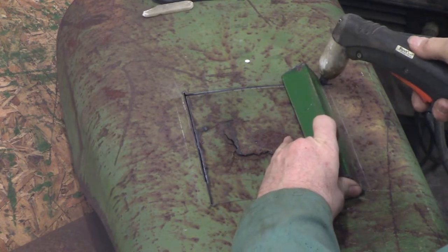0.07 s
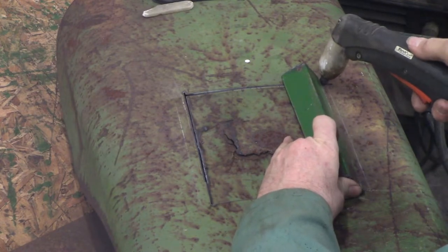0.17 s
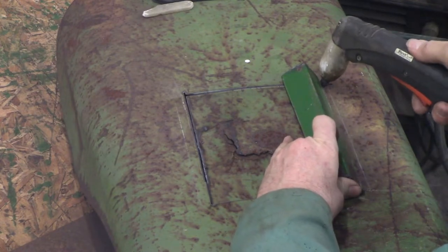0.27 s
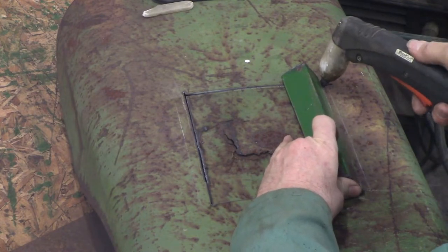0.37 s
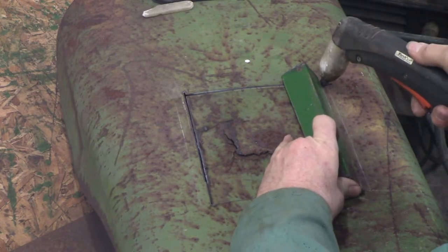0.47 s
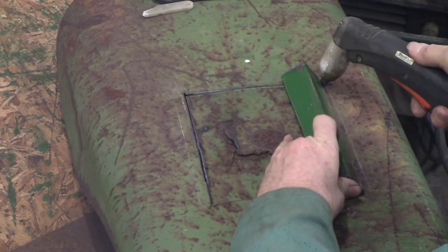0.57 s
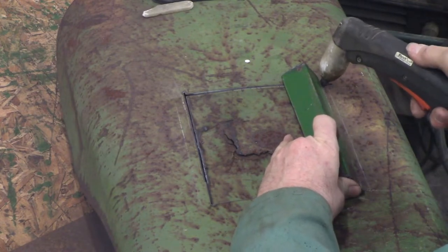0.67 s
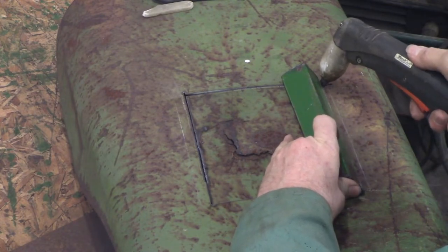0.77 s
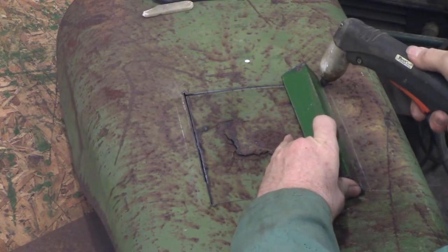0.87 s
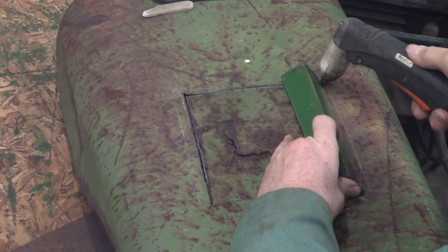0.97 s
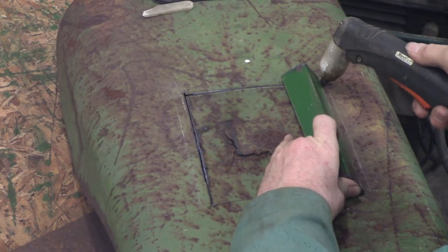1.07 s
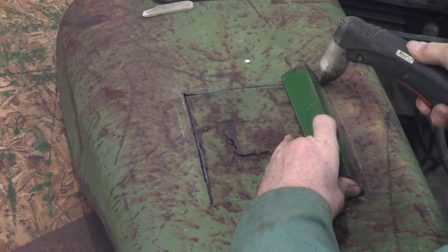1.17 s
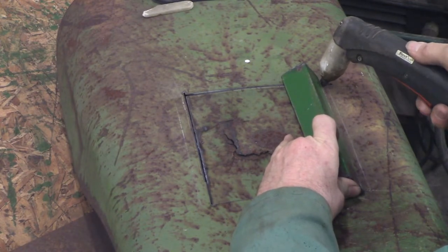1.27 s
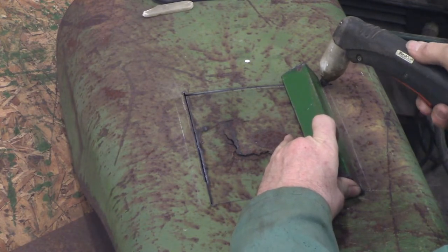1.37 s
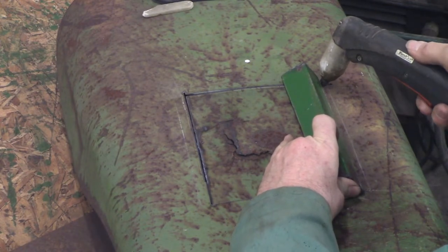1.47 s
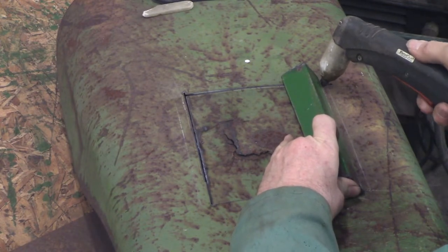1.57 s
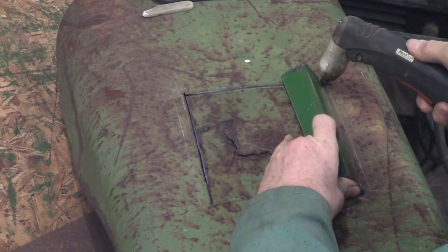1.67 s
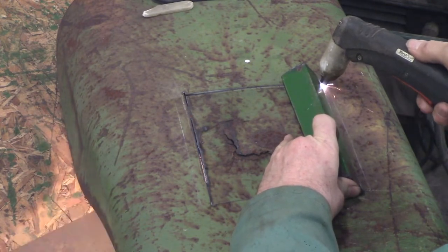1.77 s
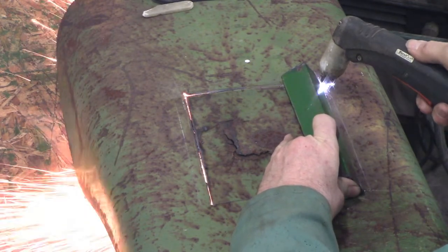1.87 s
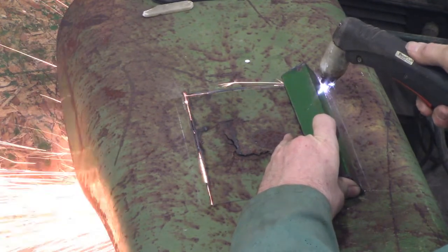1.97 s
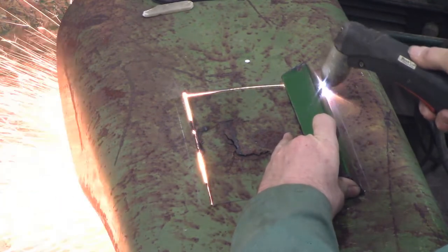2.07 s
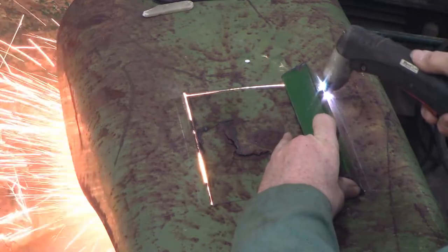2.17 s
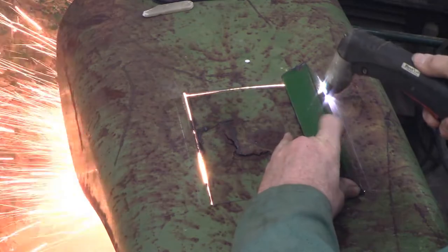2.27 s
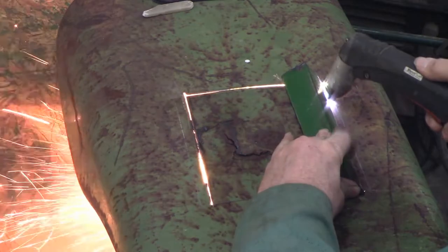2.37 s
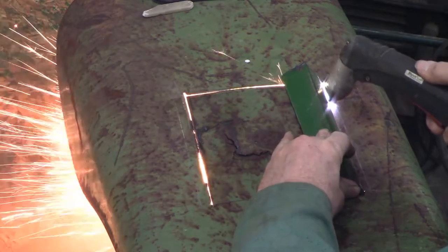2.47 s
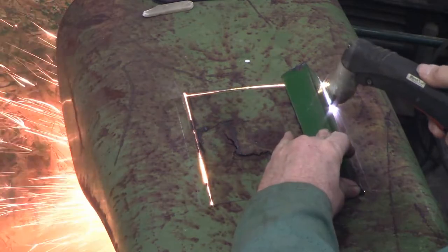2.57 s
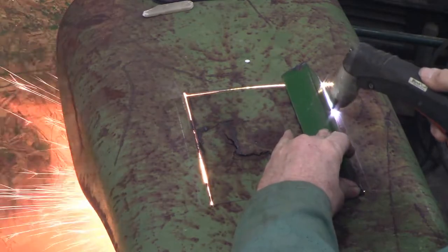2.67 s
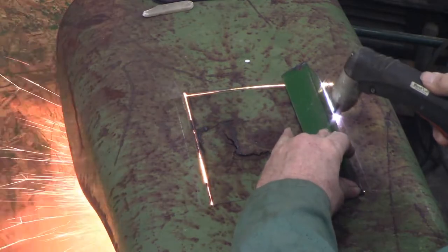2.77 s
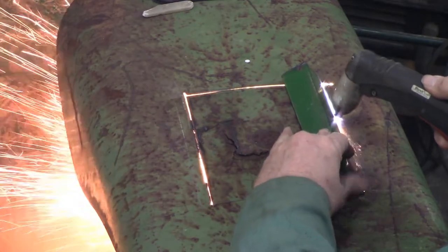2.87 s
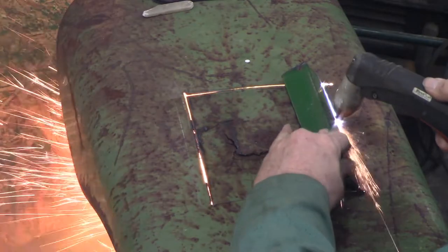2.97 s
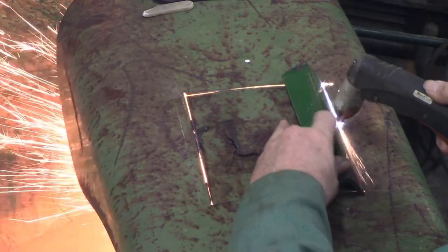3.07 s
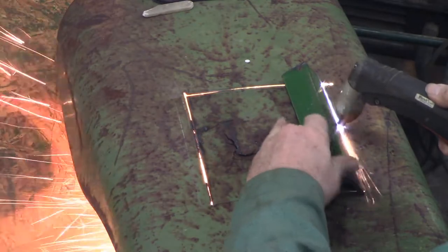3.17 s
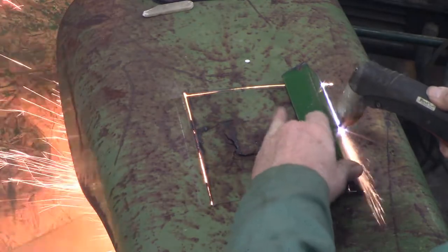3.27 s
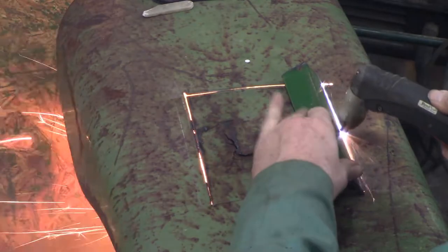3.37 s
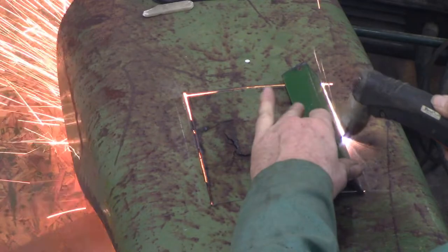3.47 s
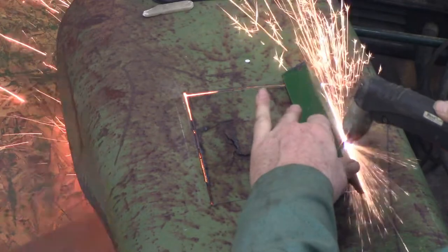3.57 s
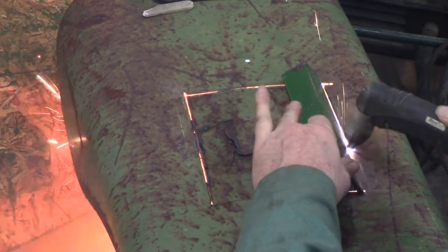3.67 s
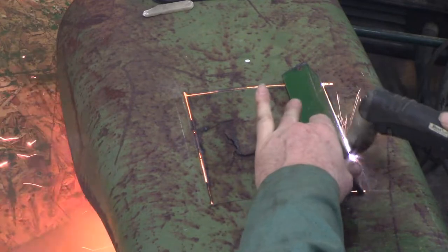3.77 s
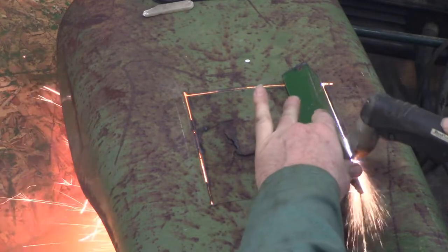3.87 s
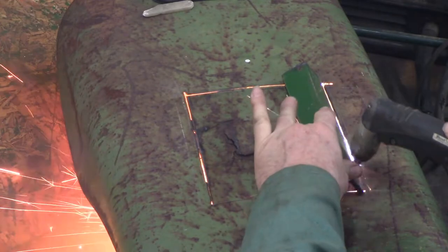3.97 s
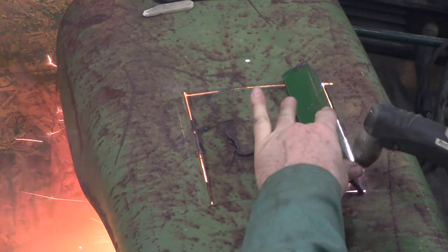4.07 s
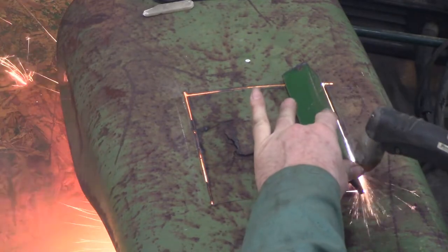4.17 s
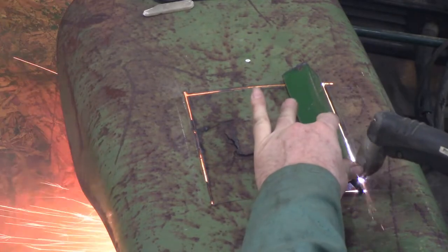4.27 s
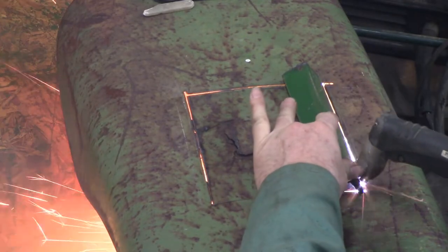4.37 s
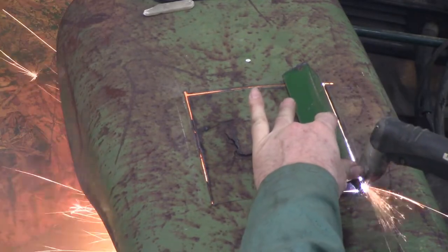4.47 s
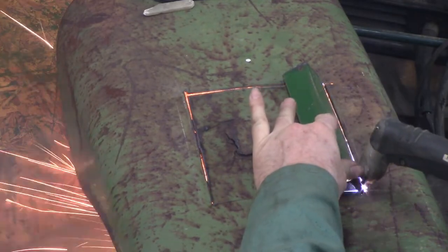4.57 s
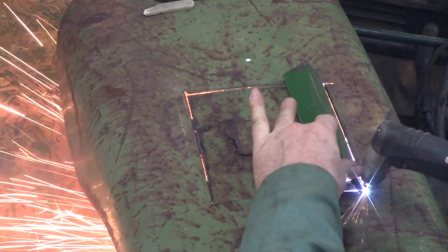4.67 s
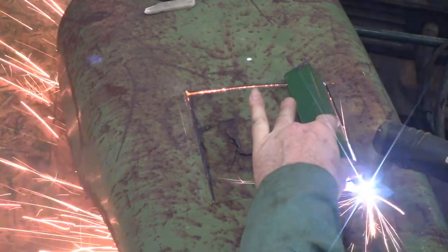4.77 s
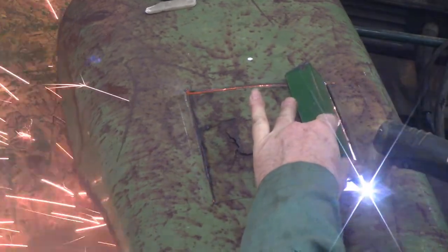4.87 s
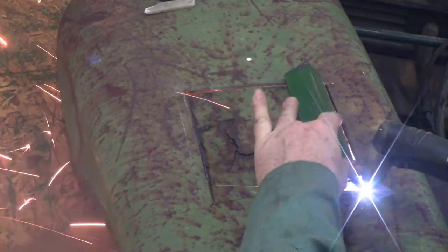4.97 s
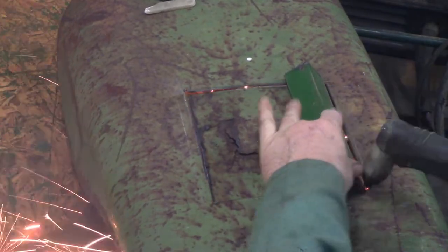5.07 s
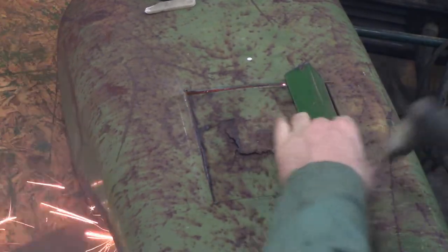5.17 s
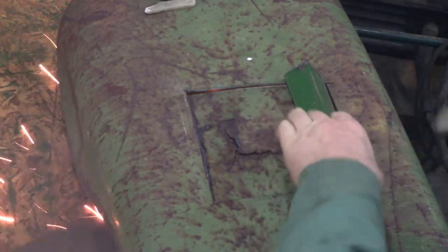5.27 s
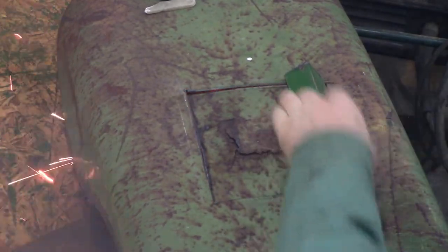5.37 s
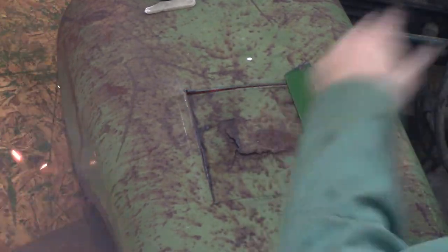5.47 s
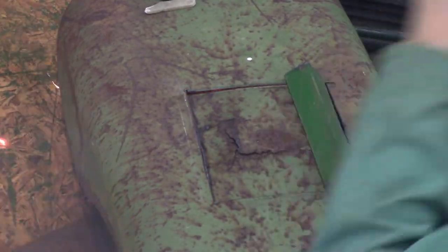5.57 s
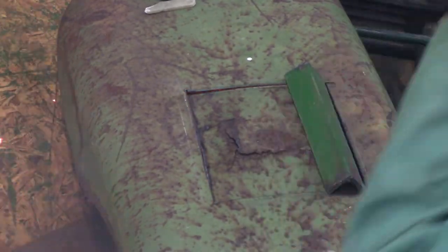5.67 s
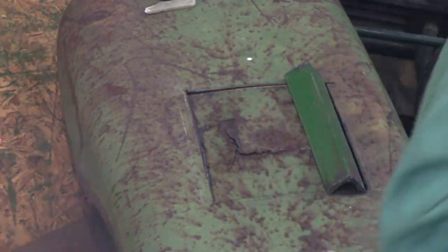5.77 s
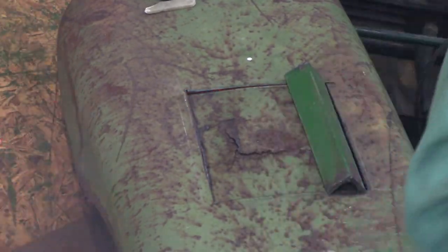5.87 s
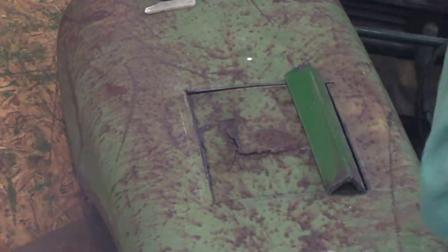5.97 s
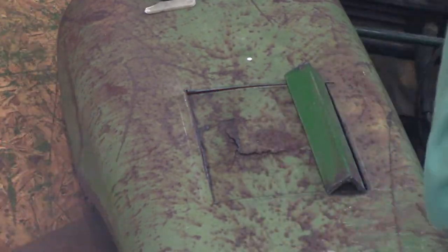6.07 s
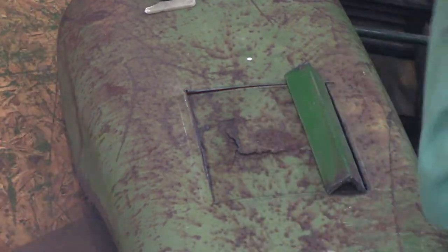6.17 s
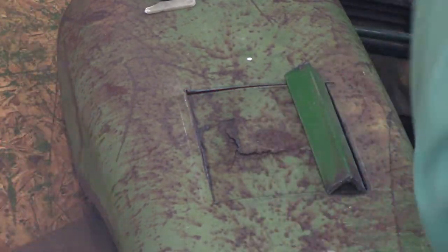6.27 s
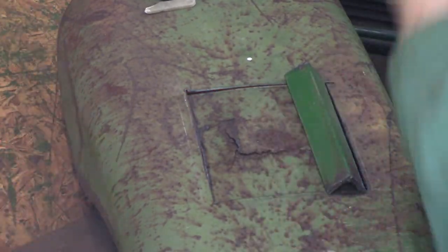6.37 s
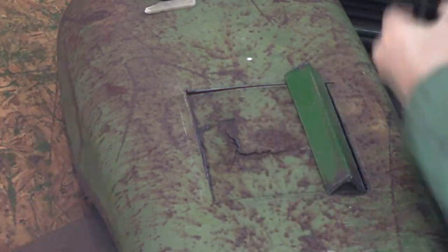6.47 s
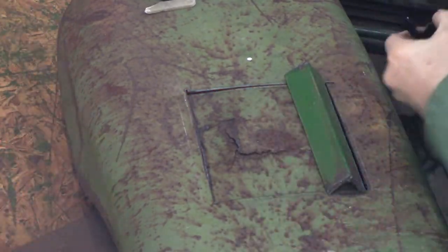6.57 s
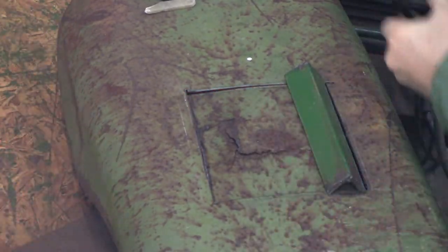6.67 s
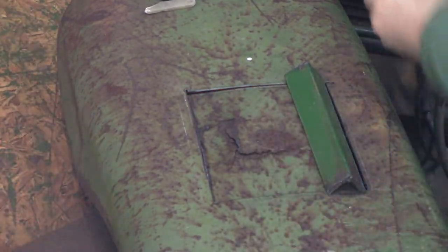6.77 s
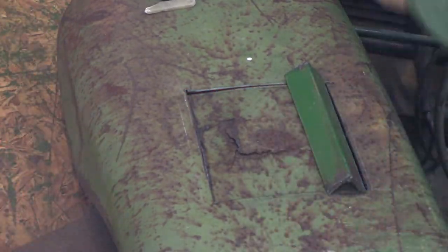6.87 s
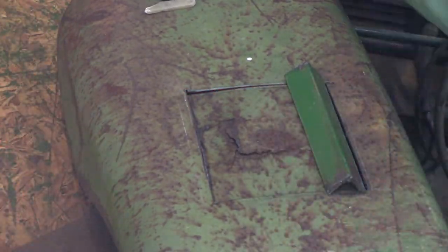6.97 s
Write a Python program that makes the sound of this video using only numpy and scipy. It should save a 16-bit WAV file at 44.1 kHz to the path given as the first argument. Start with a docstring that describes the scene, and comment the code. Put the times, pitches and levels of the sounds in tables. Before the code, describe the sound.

A hand plasma torch blows steady air onto a rusty panel, with a small scrape and a double metallic knock. The air runs out, leaving the unit's wavering fan. Then a sharp crack starts a dense, loud cutting hiss with crackle and low drumming. It weakens unevenly near the end; the loose steel pings and thuds, and only soft cooling air remains. Close, fairly dry, centred sound.

```python
"""In a workshop, a hand plasma torch cuts a rusty steel panel over the fan of its power unit.
Air (shaped noise) hisses from the nozzle, the torch knocks on the sheet (ringing modes) and the air runs down.
The arc strikes, roars through the cut and spits: fluttering noise with random pops, coloured by the slot.
The sheet pings and thumps as the cut ends, and the torch is carried away still blowing.
The fan is a set of unsteady blade tones over a soft rush of noise."""
import sys
import numpy as np
from scipy import signal
from scipy.fft import rfft, irfft, next_fast_len
from scipy.io import wavfile
from scipy.ndimage import uniform_filter1d, map_coordinates

SR = 44100
rng = np.random.default_rng(int(sys.argv[2]) if len(sys.argv) > 2 else 0)


def unload_wav(signal):
    """Save mono or channel-first audio to the path in sys.argv[1] as 16-bit WAV at rate SR, clipped to [-1, 1]."""
    wavfile.write(
        sys.argv[1],
        SR,
        np.round(np.clip(np.atleast_2d(signal).T, -1, 1) * 32767).astype(np.int16),
    )


N = 309129
T = np.arange(N) / SR   # time of every sample, in seconds

# The course of the job: trigger pulled, arc lit, sheet pierced, piece coming loose, arc out
TRIGGER_S, STRIKE_S, PIERCED_S, LOOSE_S, OUT_S = 1.714, 1.774, 1.99, 4.33, 5.245


def from_db(db):
    """Turn decibels into a gain."""
    return 10 ** (np.asarray(db) / 20)


def rms_one(x):
    """Scale a sound to unit power."""
    return x / np.sqrt(np.mean(x ** 2) + 1e-20)


def ramp(start, length):
    """Rise evenly from 0 to 1."""
    return np.clip((T - start) / length, 0, 1)


def between(start, end, fade):
    """Open a gate with soft edges, each centred on its time."""
    opening = np.clip((T - start) / fade + .5, 0, 1)
    closing = np.clip((end - T) / fade + .5, 0, 1)
    return opening * closing


def since(start):
    """Seconds passed since a moment, 0 before it."""
    return np.maximum(T - start, 0)


def drift(rate):
    """Wander at random with spread 1, mostly slower than the rate in Hz."""
    size = next_fast_len(N)
    hz = np.arange(size // 2 + 1) * SR / size
    noise = rfft(rng.standard_normal(size))
    return rms_one(irfft(noise / (1 + (hz / rate) ** 2), size)[:N])


def colour(x, spectrum):
    """Shape a sound by a spectrum that falls away beyond its first and last points; unit power."""
    size = next_fast_len(N)
    hz = np.maximum(np.arange(size // 2 + 1) * SR / size, 1)
    points, db = np.transpose(spectrum)
    gain = from_db(np.interp(np.log(hz), np.log(points), db))
    gain *= np.minimum(1, hz / points[0]) ** 3
    gain *= np.minimum(1, points[-1] / hz) ** 4
    return rms_one(irfft(rfft(x, size) * gain, size)[:N])


def steady(x, size=3000):
    """Even out the power over a window of samples, so that only the colour moves."""
    return x / np.sqrt(uniform_filter1d(x ** 2, size) + 1e-12)


def turbulence(flutter_db, flutter_rate):
    """Make noise whose strength flutters as eddies pass."""
    return rms_one(rng.standard_normal(N) * from_db(flutter_db * drift(flutter_rate)))


def spatter(per_s, spread_db):
    """Scatter random pops of molten metal, most small and a few large."""
    sizes = from_db(spread_db * np.minimum(rng.exponential(1, N), 4))
    signed = sizes * rng.choice([-1, 1], N)
    return rms_one(signed * (rng.random(N) < per_s / SR))


def ring(x, hz, t60):
    """Ring one mode: a unit click starts a dying sine of height 1 (60 dB down after t60 seconds)."""
    r = from_db(-60 / (t60 * SR))
    w = 2 * np.pi * hz / SR
    return signal.lfilter([0, np.sin(w)], [1, -2 * r * np.cos(w), r * r], x + 1e-18)


def resonance(x, hz, width_hz, gain_db):
    """Raise or cut one fixed band by a gain that may change."""
    band = signal.lfilter(*signal.iirpeak(hz, hz / width_hz, fs=SR), x)
    return x + (from_db(gain_db) - 1) * band


def moving_resonance(x, hz, width_hz, gain_db, size=256):
    """Raise or cut a band whose centre glides, stepped in blocks of samples."""
    band, state = np.zeros(N), np.zeros(2)
    k = np.tan(np.pi * width_hz / SR)
    for i in range(0, N, size):
        if gain_db[i]:
            poles = [1 + k, -2 * np.cos(2 * np.pi * hz[i] / SR), 1 - k]
            band[i:i + size], state = signal.lfilter([k, 0, -k], poles, x[i:i + size], zi=state)
    return x + (from_db(gain_db) - 1) * band


def glides(x, rows, fade, wander):
    """Pass a sound through peaks or notches that each come, slide unsteadily and go."""
    unsteady = 1 + wander * drift(6)
    for start, end, from_hz, to_hz, width_hz, gain_db in rows:
        centre_hz = np.interp(T, [start, end], [from_hz, to_hz]) * unsteady
        x = moving_resonance(x, centre_hz, width_hz, gain_db * between(start, end, fade))
    return x


def echo(x, lag_ms):
    """Repeat the sound a moment later, by a delay that may change."""
    return map_coordinates(x, [np.arange(N) - lag_ms * SR / 1000], order=3)


def workshop(x, wet_db, t60):
    """Add scattered reflections from bench and walls, dying away."""
    age = T[:SR // 2]
    echoes = rng.standard_normal(len(age)) * (rng.random(len(age)) < .02) * (age > .002)
    echoes *= from_db(-60 * age / t60)
    wet = signal.fftconvolve(x, echoes / np.linalg.norm(echoes))[:N]
    return (x + from_db(wet_db) * wet) / np.sqrt(1 + from_db(2 * wet_db))


# Tone colour of the fan's rush of air
# columns: pitch_hz [Hz], level_db [dB per Hz]
FAN_RUSH_COLOUR = [(45, -40), (100, -50), (180, -8), (410, -4), (520, 4), (640, -0.5), (780, -3.5),
                   (1250, -7.5), (1500, -12), (2200, -16)]
BLADE_HZ, SECOND_BLADE_HZ, LOAD_SAG_HZ = 614, 596, 6   # the sag is that of the first tone
BLADE_DB, RUSH_DB = -42.5, -40
WAVER_DB, JITTER = 2.0, .0035   # spread of the tones' level, and of their pitch as a share
BLADE_DB_PER_S, OCTAVE_DB_PER_S = -0.5, -0.88   # the tones slowly weaken
# Both fan sounds are weaker for a while; the tones come back first
SHADED_FROM_S, TONES_BACK_S, RUSH_BACK_S, SHADE_DB = 2.4, 5.6, 6.63, -5


def fan(octave_db, second_db):
    """The arc's load slows the fans a little: two unsteady blade tones and an octave over a soft rush."""
    speed = 1 - LOAD_SAG_HZ / BLADE_HZ * between(STRIKE_S, OUT_S, fade=0.22)

    def tone(hz, db):
        """Blur and shake one blade tone, as the eddies it meets do."""
        phase = 2 * np.pi * np.cumsum(hz * speed * (1 + JITTER * drift(25))) / SR
        return np.sin(phase) * from_db(db + WAVER_DB * drift(18))

    blade_db = BLADE_DB_PER_S * T + SHADE_DB * between(SHADED_FROM_S, TONES_BACK_S, fade=.1)
    blades = tone(BLADE_HZ, blade_db) + tone(SECOND_BLADE_HZ, blade_db + second_db)
    octave = tone(2 * BLADE_HZ, octave_db + OCTAVE_DB_PER_S * T)
    rush = colour(rng.standard_normal(N), FAN_RUSH_COLOUR) * from_db(RUSH_DB)
    shade = from_db(SHADE_DB * between(SHADED_FROM_S, RUSH_BACK_S, fade=0.87))
    return from_db(BLADE_DB) * (blades + octave) + rush * shade


# The natural tones (modes) of the steel panel
# columns: pitch_hz [Hz], level_db [dB], t60_s [s, time to die by 60 dB]
PANEL_MODES = [(206.3, -12.5, 0.47), (267.2, -1, 0.27), (309, -4.5, 0.18), (319.8, -1.5, 0.27),
               (355.5, -5.5, 0.16), (393.5, -15.5, 0.22), (435, -4.5, 0.079), (497, -17, 0.14),
               (680, -19, 0.11), (770, -4, 0.21), (805, -10, 0.14), (903, -16, 0.2), (1300, -23, 0.23),
               (2380, -21, 0.18), (2800, -30, 0.061)]


def sheet(force):
    """Any force on the panel rings all its modes, pushed in alternating directions."""
    ringing = 0
    for k, (hz, db, t60) in enumerate(PANEL_MODES):
        ringing = ringing + (-1) ** k * from_db(db) * ring(force, hz, t60)
    return ringing


DRAG_ATTACK_S, DRAG_RELEASE_S = 0.011, 0.069


def strokes(rows):
    """Gain of a series of rubs: each swells, holds and dies away."""
    gain = 0
    for s, length, db in rows:
        dying = np.exp(-since(s + length) / DRAG_RELEASE_S)
        gain = gain + from_db(db) * ramp(s, DRAG_ATTACK_S) * dying
    return gain


# Nozzle and guide bar dragging on the sheet
# columns: start_s [s], length_s [s], level_db [dB]
SHEET_DRAGS = [(.21, 0.19, -40), (1.19, 0.14, -37.5), (2.0, 0.38, -34.5), (3.38, 0.13, -32.5),
               (4.59, 0.057, -39), (4.73, 0.14, -35), (4.99, 0.097, -31.5), (5.2, 0.24, -39.5)]
# The hose rubbing as the torch is moved
# columns: start_s [s], length_s [s], level_db [dB]
RUBS_OF_HOSE = [(.21, .06, -60), (6.28, 0.28, -57.5), (6.8, .25, -54)]
# Tone colours of the scuffing sheet and of the hose
# columns: pitch_hz [Hz], level_db [dB per Hz]
SCUFF_SPECTRUM = [(140, -18), (220, -7), (320, -3), (450, -5), (650, -8.5), (1000, -16), (1600, -32)]
HOSE_SPECTRUM = [(30, -32), (90, -6), (180, -2), (300, -5)]
RESTING_DB = -51   # force of the resting hand


def handling(scuff_db):
    """The sheet stirs and scuffs under the resting hand and with each drag; the hose rubs dully."""
    force = from_db(RESTING_DB) * between(-1, 5.7, fade=0.24) + strokes(SHEET_DRAGS)
    rubbing = colour(turbulence(flutter_db=2.0, flutter_rate=33), SCUFF_SPECTRUM)
    ringing = rms_one(sheet(rubbing))
    scuff = colour(turbulence(flutter_db=-1.0, flutter_rate=98), SCUFF_SPECTRUM)
    stir = steady(ringing + from_db(scuff_db) * scuff) * force
    hose = colour(turbulence(flutter_db=-3.0, flutter_rate=15), HOSE_SPECTRUM)
    return stir + hose * strokes(RUBS_OF_HOSE)


# Knocks on the sheet and cracks of the arc
# columns: start_s [s], ring_db [dB], dull_thud_db [dB], sharp_crack_db [dB]
BLOWS = [(.242, -48, -42, -15), (1.1295, -19.5, -19, -4.5), (1.153, -26, -19, -45), (1.256, -37, -26, -45),
         (1.7741, -30, -19.5, -7), (2.203, -27.5, -38, -37), (3.448, -52, -18, -35),
         (4.984, -25.5, -7, -12), (5.034, -43, -23, -45), (5.118, -38, -27, -22), (5.375, -42, -31, -50)]
# Tone colour of the clatter, the panel's many higher modes
# columns: pitch_hz [Hz], level_db [dB per Hz]
CLATTER_SPECTRUM = [(170, -20), (280, 12.5), (450, -6), (800, 2.5), (1100, -8), (1350, -19), (2500, -31)]
CRACK_TICK_DB = 3.5   # the first contact, over the short burst that follows it


def knocks(crack_decay, clatter_decay, clatter_db):
    """Each blow is a short crack, a dull push of the panel, its low modes, and a dense higher clatter."""
    rings, thuds, cracks = np.zeros((3, N))
    for s, ring_db, thud_db, crack_db in BLOWS:
        i = round(s * SR)
        rings[i], thuds[i], cracks[i] = from_db([ring_db, thud_db, crack_db])
    age = T[:SR // 2]

    burst = rng.standard_normal(len(age)) * np.exp(-age / crack_decay)
    crack = signal.fftconvolve(cracks, burst)[:N] + from_db(CRACK_TICK_DB) * cracks
    crack = signal.sosfilt(signal.butter(2, [700, 8000], "band", fs=SR, output="sos"), crack)

    dense = colour(rng.standard_normal(N), CLATTER_SPECTRUM)[:len(age)]
    clatter = signal.fftconvolve(rings, dense * np.exp(-age / clatter_decay))[:N]

    thud = ring(thuds, hz=263, t60=0.04)
    thud = thud - 0.47 * ring(thuds, hz=680, t60=0.014) + 0.17 * ring(thuds, hz=1300, t60=0.061)
    body = sheet(rings) + thud + from_db(clatter_db) * clatter
    body = signal.sosfilt(signal.butter(3, 150, "high", fs=SR, output="sos"), body)
    return body + crack


# Moments when the loose piece sings
# columns: start_s [s], end_s [s], level_db [dB]
SINGING = [(4.74, 4.789, -19), (4.85, 4.885, -35)]
# The natural tones of the loose piece
# columns: pitch_hz [Hz], level_db [dB]
LOOSE_PIECE_MODES = [(603, -11), (829, 1), (974, -21)]


def pings(fall_s, tail_db, tail_s):
    """The nearly freed steel sings for an instant and leaves a faint tail."""
    level = 0
    for start, end, db in SINGING:
        age = since(start)
        note = between(start, end, fade=0.0082) * np.exp(-age / fall_s)
        tail = from_db(tail_db) * between(start, 8, fade=.014) * np.exp(-age / tail_s)
        level = level + from_db(db) * (note + tail)
    phase = 2 * np.pi * np.cumsum(1 + 0.0055 * drift(40)) / SR   # shared by all modes, per Hz
    return level * sum(from_db(db) * np.sin(hz * phase) for hz, db in LOOSE_PIECE_MODES)


# Soft pressure puffs as the arc lights, flares and breaks through the edge
# columns: start_s [s], level_db [dB, the kick before its low end is trimmed]
ARC_PUFFS = [(1.777, -30.5), (3.77, -30), (4.984, -38)]


def puffs(hz, t60, flare_db):
    """Pressure kicks from the arc ring one low tone: a few strong ones and many random flares."""
    kicks = from_db(flare_db) * spatter(per_s=10.8, spread_db=4.5) * between(1.9, 4.7, fade=0.1)
    for s, db in ARC_PUFFS:
        kicks[round(s * SR)] += from_db(db)
    return signal.sosfilt(signal.butter(2, 85, "high", fs=SR, output="sos"), ring(kicks, hz, t60))


# Strength of the cutting jet, given as the level of its hiss
# columns: time_s [s], level_db [dB]
JET_STRENGTH = [(1.78, -26), (2.03, -19), (3.55, -20), (3.74, -19), (3.76, -21), (4.09, -20.5),
                (4.11, -22.5), (4.56, -25.5), (4.61, -24), (4.68, -27), (4.96, -22.5), (5.0, -27.5),
                (5.06, -31.5), (5.13, -27.5), (5.27, -36)]
FULL_JET_DB = -19.5


def driven(law):
    """Gain of a sound that follows the jet and changes steadily as the torch travels."""
    level_db, share, db_per_s = law
    jet_db = np.interp(T, *np.transpose(JET_STRENGTH))
    return from_db(level_db + share * (jet_db - FULL_JET_DB) + db_per_s * since(PIERCED_S))


# How the panel's rumble follows the jet
# columns: full_jet_db [dB], share of the jet's swing [ratio], change [dB per s]
RUMBLE_DRIVE = (-29, 0.3, -1.5)
# Tone colour of the drumming
# columns: pitch_hz [Hz], level_db [dB per Hz]
DRUM_SPECTRUM = [(30, -45), (90, -36), (130, -17), (190, -4), (270, -1.5), (340, 5), (430, -3.5),
                 (700, -16), (1500, -36)]


def panel_rumble(unpierced_db, slack_db, surge_db):
    """The jet drums unevenly on the sheet, harder once it has pierced it, less as the piece goes slack."""
    ringing = rms_one(sheet(turbulence(flutter_db=0.5, flutter_rate=57)))
    drumming = colour(turbulence(flutter_db=1.5, flutter_rate=9.6), DRUM_SPECTRUM)
    drum = steady(rms_one(ringing + from_db(-0.5) * drumming), size=12000)
    level_db = unpierced_db * between(-1, PIERCED_S, fade=0.044)
    level_db = level_db + slack_db * ramp(LOOSE_S, 0.24) + surge_db * drift(0.77)
    return drum * driven(RUMBLE_DRIVE) * from_db(level_db) * between(STRIKE_S, OUT_S, fade=0.046)


# Notches (and one faint peak) that the gap under the nozzle slides through the hiss
# columns: start_s [s], end_s [s], from_hz [Hz], to_hz [Hz], width_hz [Hz], gain_db [dB]
GAP_NOTCHES = [(.3, .72, 9050, 8950, 500, -7), (.66, 1.0, 8400, 8100, 400, 1),
               (.78, 1.98, 11500, 11300, 450, -6), (2.0, 3.354, 11000, 10600, 800, -11),
               (2.75, 3.45, 10100, 9900, 300, -9), (3.0, 3.95, 6350, 6000, 400, -7),
               (3.75, 4.9, 5400, 5200, 450, -2.5), (3.1, 3.75, 7550, 7100, 350, -6),
               (3.3, 4.55, 11750, 11400, 550, -13), (3.35, 3.95, 13300, 12700, 500, -7),
               (3.45, 4.5, 10700, 10200, 500, -3), (3.897, 4.5, 2820, 2740, 350, -6),
               (3.9, 4.7, 14950, 14200, 600, -5)]
# Peaks (+) and notches (-) of the slot, each swelling as the nozzle passes its place
# columns: strongest_s [s], pitch_hz [Hz], width_hz [Hz], gain_db [dB, before it wavers]
SLOT_TONES = [(2.2, 7000, 250, -0.5), (2.4, 3100, 905, -7), (2.5, 2340, 250, 3), (2.8, 13450, 495, 6),
              (3.1, 9150, 500, 1), (3.6, 4300, 500, 2), (3.7, 9360, 500, 0), (3.9, 8540, 800, 6),
              (3.95, 6830, 600, 4), (4.1, 13700, 700, 6), (4.4, 3200, 400, -0.5)]
SWELL_S = 0.36   # how long a slot tone takes to swell


def gap_and_slot(stream, waver_db):
    """The gap under the nozzle notches the hiss; the slot colours it as the cut grows."""
    stream = glides(stream, GAP_NOTCHES, fade=0.25, wander=0.0047)
    for s, hz, width_hz, gain_db in SLOT_TONES:
        swell = np.exp(-((T - s) / SWELL_S) ** 2)
        stream = resonance(stream, hz, width_hz, swell * (gain_db + waver_db * drift(10.5)))
    return stream


def swish(x, depth_db, rate, count=9):
    """Treble bands swell and fade each on their own, late in the cut and after it, as the jet sways."""
    lifted = between(4.8, 8, fade=0.55)
    for hz in np.geomspace(6200, 14000, count):
        band = signal.lfilter(*signal.iirpeak(hz, 14, fs=SR), x)
        x = x + (from_db(depth_db * lifted * drift(rate)) - 1) * band
    return x


# Whooshes, whistles and dips as the torch is lowered, digs in, nears the edge and is pulled off
# columns: start_s [s], end_s [s], from_hz [Hz], to_hz [Hz], width_hz [Hz], gain_db [dB]
TORCH_WHOOSHES = [(.55, .72, 13000, 12850, 400, 3), (.7, .8, 12900, 11900, 400, 2),
                  (.71, .87, 13400, 11600, 450, -9), (1.758, 1.94, 1140, 1220, 170, 6.5),
                  (2.9, 3.79, 750, 770, 70, 5), (3.764, 4.71, 785, 835, 94, 7.5),
                  (4.132, 4.72, 1475, 1445, 50, 8.5), (4.153, 4.32, 1540, 1530, 70, 6),
                  (4.967, 5.063, 1700, 1500, 1000, 3), (5.157, 5.226, 2650, 1900, 1000, 7.5),
                  (5.15, 5.45, 5600, 4500, 2000, -2), (5.204, 5.6, 8160, 9400, 1800, 6.5),
                  (6.55, 6.85, 9700, 7900, 600, -3)]
# Close reflections off sheet, guide bar and hand, as the nozzle passes
# columns: start_s [s], end_s [s], delay_ms [ms, before it sways], share [signed ratio]
CLOSE_REFLECTIONS = [(1.6, 1.98, 0.88, 0.16), (2.0, 2.8, .686, 0.094), (2.0, 2.6, 0.45, 0.044),
                     (2.45, 4.4, 0.43, 0.053), (2.404, 3.1, 0.86, 0.014), (2.85, 3.75, 0.76, 0.12),
                     (3.4, 3.95, .86, -0.0024), (3.7, 4.25, 1.3, 0.047), (4.15, 5.1, 0.58, 0.0034)]
# The jet's echo off the sheet starts to lag more at the arc's end, while it fades out
ECHO_NEAR_MS, ECHO_FAR_MS, ECHO_SWAY_MS = 0.67, 1.6, 0.005
RAISE_S, ECHO_GONE_S = 0.76, 5.6


def air_stream(sheet_echo_db):
    """One turbulent jet, with spatter while the arc burns, coloured by the gap and its own echoes."""
    pops = from_db(-14) * spatter(per_s=800, spread_db=2.0) * between(STRIKE_S, OUT_S, fade=.008)
    jet = turbulence(flutter_db=0.23, flutter_rate=77) + pops
    stream = gap_and_slot(jet, waver_db=2.0)
    stream = glides(stream, TORCH_WHOOSHES, fade=0.027, wander=.005)
    sway_ms = ECHO_SWAY_MS * drift(3.8)
    combs = 0
    for start, end, lag_ms, share in CLOSE_REFLECTIONS:
        combs = combs + share * between(start, end, fade=.15) * echo(stream, lag_ms + sway_ms)
    sheet_ms = ECHO_NEAR_MS + (ECHO_FAR_MS - ECHO_NEAR_MS) * ramp(OUT_S, RAISE_S) + sway_ms
    fading = 1 - ramp(OUT_S, ECHO_GONE_S - OUT_S)
    sheet_echo = from_db(sheet_echo_db) * fading * echo(stream, sheet_ms)
    return swish(stream + combs + sheet_echo, depth_db=2.0, rate=14)


# Tone colour of the air before the cut
# columns: pitch_hz [Hz], level_db [dB per Hz]
PURGE_SPECTRUM = [(400, -4.5), (700, -19), (1500, -11.5), (2300, -8), (3500, -9.5), (3950, -4.5),
                  (4400, -8), (5200, -5), (5900, 0), (6500, 0), (7100, 1.5), (8000, -4), (9400, -1),
                  (10100, 1), (10900, -4.5), (12900, -2.5), (14200, -4), (15800, -9.5)]
# The air is louder until the nozzle is set down, dips then, and runs out when the valve shuts
PURGE_DB, HELD_UP_DB = -26, 2.5
SET_DOWN_S, SET_DOWN_DIP_DB, SET_DOWN_LENGTH_S = 0.158, -1.5, 0.06
VALVE_SHUT_S, RUN_DOWN_S, REFILL_S = 1.24, 0.5, 0.03


def purge(stream):
    """Compressed air blows on the sheet, runs down, and is opened again by the trigger."""
    refill = 1 - np.exp(-since(TRIGGER_S) / REFILL_S)
    pressure = np.maximum(1 - ramp(VALVE_SHUT_S, RUN_DOWN_S), from_db(-1.0) * refill)
    dip_db = SET_DOWN_DIP_DB * between(SET_DOWN_S, SET_DOWN_S + SET_DOWN_LENGTH_S, fade=0.009)
    level_db = PURGE_DB + HELD_UP_DB * between(-1, SET_DOWN_S, fade=.03) + dip_db
    air = steady(colour(stream, PURGE_SPECTRUM)) * pressure * from_db(level_db)
    return air * between(-1, STRIKE_S, fade=0.0076)


# Tone colours of the cooling air after the cut: its main hiss and its top
# columns: pitch_hz [Hz], level_db [dB per Hz]
LIFTED_SPECTRUM = [(800, -5), (2000, -6), (2700, -5.5), (4000, -7), (5500, -5), (7000, -4.5), (10600, -5.5),
                   (11200, -28)]
LIFTED_TOP_SPECTRUM = [(10400, -14), (10900, -2), (13000, -2), (15800, -6)]
ARC_FADE_S = 0.057   # the dying arc gives way to plain air
# The air settles as the torch is lifted, then dulls as it is turned away
AFTER_HISS_DB, AFTER_TOP_DB, LIFT_EXTRA_DB, LIFT_S = -40, -40, 5.5, 0.21
TURN_S, TURN_LENGTH_S, TURN_BACK_S, TURN_HISS_DB, TURN_TOP_DB = 6.465, 0.68, 6.98, -7.5, -13.5


def afterflow(stream):
    """Cooling air flows on; it dulls as the torch swings away, and its top returns as it swings back."""
    near_db = LIFT_EXTRA_DB * np.exp(-since(OUT_S) / LIFT_S)
    hiss_db = AFTER_HISS_DB + near_db + TURN_HISS_DB * ramp(TURN_S, TURN_LENGTH_S)
    turned_db = TURN_TOP_DB * between(TURN_S + 0.1, TURN_BACK_S, fade=0.52)
    top_db = AFTER_TOP_DB + 1.1 * near_db + turned_db
    hiss = steady(colour(stream, LIFTED_SPECTRUM)) * from_db(hiss_db)
    top = steady(colour(stream, LIFTED_TOP_SPECTRUM)) * from_db(top_db)
    return (hiss + top) * between(OUT_S, 8, fade=ARC_FADE_S)


# Tone colours of the cut: the arc's roar, the jet's hiss and its sizzling top
# columns: pitch_hz [Hz], level_db [dB per Hz]
ROAR_SPECTRUM = [(30, -41), (90, -38), (200, -2), (450, 0), (780, 2), (980, 0.5), (1350, 2), (1900, 0.5),
                 (2100, -1), (2400, 0), (3400, -5), (4000, -9.5), (4400, -22)]
HISS_SPECTRUM = [(3700, -9.5), (4000, -8), (4400, -5), (4900, -4), (5800, -2), (7050, 0.5), (7600, -1.5),
                 (9700, 0), (10600, -3.5), (11200, -11.5)]
SIZZLE_SPECTRUM = [(10400, -28), (10900, 2.5), (12000, 2), (13400, 3), (14500, -3), (15800, -1)]
# How each of them follows the jet
# columns: full_jet_db [dB], share of the jet's swing [ratio], change [dB per s]
ROAR_DRIVE = (-26.5, 0.43, -1.06)
HISS_DRIVE = (-19.5, 1.0, 0.069)
SIZZLE_DRIVE = (-25.5, 1, -0.85)
BUILD_UP_DB, BUILD_UP_S = -2.5, 0.08   # the roar starts weaker while the arc digs in


def cutting_jet(stream):
    """The arc roars and spits while the hot jet hisses through the slot it has opened."""
    arc = rms_one(stream * from_db(1.0 * drift(66)))
    arc = arc + from_db(-10.0) * spatter(per_s=450, spread_db=1.0)
    build_up = from_db(BUILD_UP_DB * np.exp(-since(STRIKE_S) / BUILD_UP_S))
    roar = colour(arc, ROAR_SPECTRUM) * driven(ROAR_DRIVE) * build_up
    hiss = steady(colour(stream, HISS_SPECTRUM)) * driven(HISS_DRIVE)
    sizzle = steady(colour(stream, SIZZLE_SPECTRUM)) * driven(SIZZLE_DRIVE)
    burning = between(STRIKE_S, 8, fade=0.01) * between(-1, OUT_S, fade=ARC_FADE_S)
    return (roar + hiss + sizzle) * from_db(0.49 * drift(14)) * burning


def scene():
    """Mix torch, panel and fan, all heard from straight ahead (both channels alike)."""
    stream = air_stream(sheet_echo_db=-21)
    air = workshop(purge(stream) + cutting_jet(stream) + afterflow(stream), wet_db=-13, t60=0.084)

    blows = knocks(crack_decay=0.0011, clatter_decay=0.024, clatter_db=-0.5)
    note = pings(fall_s=0.071, tail_db=-14.5, tail_s=.12)
    steel = workshop(blows + note, wet_db=-8.5, t60=0.38)

    lows = panel_rumble(unpierced_db=-5.5, slack_db=-3.5, surge_db=0.5)
    lows = lows + handling(scuff_db=-1.5) + puffs(hz=141, t60=0.11, flare_db=-77)
    mono = air + steel + lows + fan(octave_db=-3.5, second_db=-10)
    return np.stack([mono, mono])


CUTOFF_HZ = 15750


def record(dry):
    """Cut the top steeply with a low-pass filter."""
    return signal.sosfilt(signal.ellip(12, .1, 90, CUTOFF_HZ, fs=SR, output="sos"), dry)


dry = scene()
out = record(dry)
unload_wav(out)
```